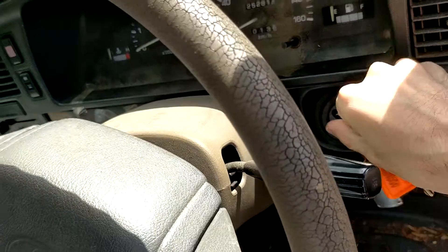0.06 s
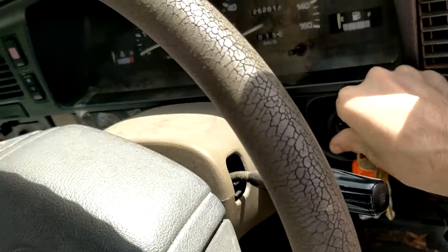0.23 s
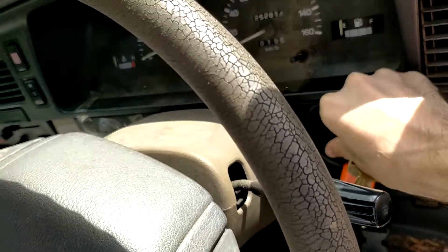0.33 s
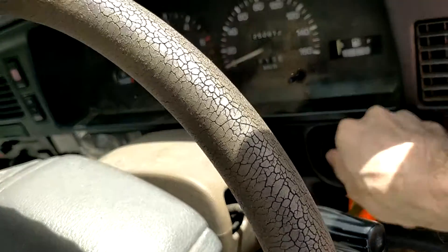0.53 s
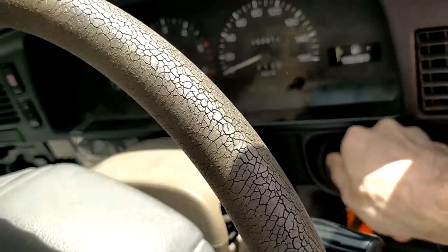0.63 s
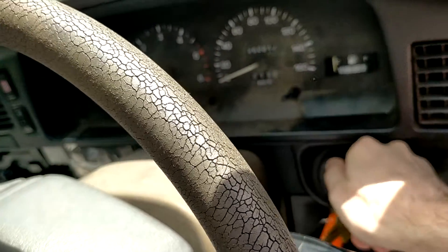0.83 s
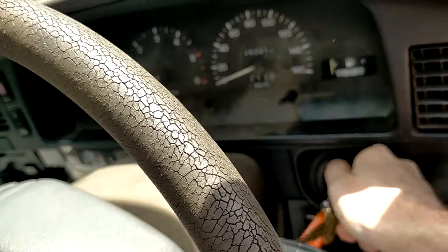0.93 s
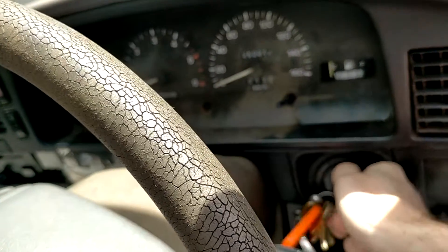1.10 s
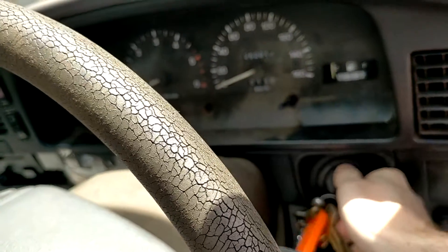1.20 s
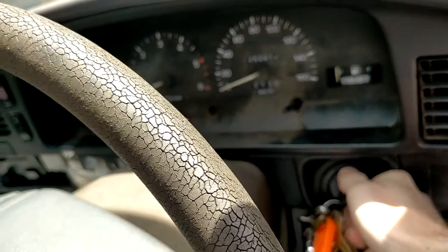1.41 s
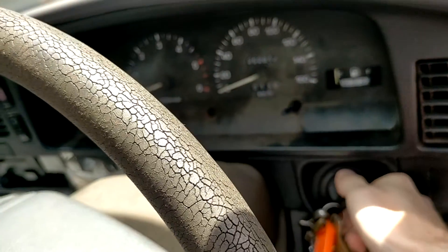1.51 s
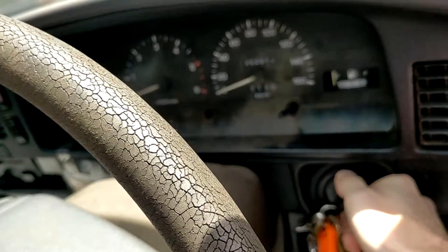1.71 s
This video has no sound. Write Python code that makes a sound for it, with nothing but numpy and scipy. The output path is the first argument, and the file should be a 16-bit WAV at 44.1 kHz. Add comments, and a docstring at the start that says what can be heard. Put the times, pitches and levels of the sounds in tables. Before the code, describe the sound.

A key turns in a car ignition, close and dry in a small quiet cabin. Faint ticks lead to a cluster of clicks and key rattles from 0.24 to 0.45 seconds, more taps around 0.55-0.67, a crunch and clack near 0.75-0.8, then strong gritty crunches at 0.9-1.15. Small clicks end by 1.3; a tiny scrape follows at 1.56 over faint hiss, rumble and thin distant whine.

```python
"""Key in a car's ignition lock

A hand works the key, with a phone recording close by in the quiet cabin.
Taps of key bunch and lock ring the plastic dashboard and the damped keys, as sums of dying sines.
Lock parts crunch through their detents: dense bursts of random clicks drive the same objects and a thud.
The hand rustles, in patchy clicks, and thumps, in swelling low sines.
Shaped noise gives faint hiss and rumble beneath, and a gliding sine a far whine."""
import sys
import numpy as np
from scipy import signal
from scipy.fft import rfft, irfft
from scipy.io import wavfile
from scipy.ndimage import uniform_filter1d

SR = 44100
rng = np.random.default_rng(int(sys.argv[2]) if len(sys.argv) > 2 else 0)


def generate_wav(signal):
    """Clip the signal to [-1, 1] and save it as 16-bit WAV at the path in sys.argv[1]."""
    frames = np.transpose(np.atleast_2d(signal))
    scaled = np.clip(frames, -1, 1) * 32767
    pcm = np.round(scaled).astype(np.int16)
    wavfile.write(sys.argv[1], SR, pcm)


N = 77175

# Resonances of the plastic dashboard panel. Each row: frequency in Hz, relative level in dB,
# undamped t60 in seconds.
PANEL_MODES = [(560, -36, 0.21), (800, -26.5, 0.0077), (879, 4, 0.049), (1033.5, -8.5, 0.1),
               (1310, 6.5, 0.018), (1540, -1.5, 0.047), (1690, 3.5, 0.019), (1890, -2, 0.016),
               (2055, 1.5, 0.026), (2327, 5, 0.01), (2380, 1.5, 0.017), (2580, -1.5, 0.034),
               (3074, 0.5, 0.032)]
# Resonances of the key bunch. Each row: frequency in Hz, relative level in dB, undamped t60 in seconds.
KEY_MODES = [(3500, 2, 0.015), (3660, -6.5, 0.13), (4167, -1, 0.046), (4387, -4, 0.07),
             (4916, 16.5, 0.0061), (5277, 2.5, 0.035), (5860, 5.5, 0.011), (6116, -7.5, 0.043),
             (6456, 7.5, 0.024), (6970, 4, 0.042), (7480, 16, 0.0091), (7773, -15.5, 0.036),
             (8100, -24, 0.019)]
# Low resonances heard as a thud. Each row: frequency in Hz, relative level in dB, undamped t60 in seconds.
THUD_MODES = [(130, 5.5, 0.054), (165, 4, 0.088), (300, 9, 0.026), (438, 9.5, 0.014), (560, 0.5, 0.04),
              (816, -4.5, 0.074)]


def undb(db):
    """Amplitude factor of a level in dB."""
    return 10 ** (np.asarray(db) / 20)


def unit(x):
    """Signal scaled to rms 1."""
    return x / np.sqrt(np.mean(x ** 2))


def unit_energy(x):
    """Signal scaled to energy 1."""
    return x / np.sqrt(np.sum(x ** 2))


def fade(t, t60):
    """Exponential decay that falls 60 dB in t60 seconds."""
    return np.exp(-np.log(1000) * t / t60)


def add(out, start, x):
    """Mix x into out from start (s), cut at the end of out."""
    i = int(start * SR)
    x = x[:len(out) - i]
    out[i:i + len(x)] += x


def ring(modes, chance, damp, focus_hz=None, slope_db=15.5):
    """Answer of an object to one blow, energy 1; the favoured pitch sets each mode's share and phase.

    damp is a share of the undamped t60; slope_db weakens modes per octave away from focus_hz."""
    scatter_db, detune = 1.5, .005  # spread of level; of frequency, as a share
    in_phase_oct = .42  # modes this near the favoured pitch start together, the others opposite
    t = np.arange(SR // 5) / SR
    out = np.zeros(len(t))
    for k, ((hz, db, t60), a, b) in enumerate(zip(modes, chance, chance[::-1])):
        if focus_hz:
            octaves_off = abs(np.log2(hz / focus_hz))
            sign = np.sign(in_phase_oct - octaves_off)
        else:
            octaves_off = 0
            sign = (-1) ** k
        level = undb(db - slope_db * octaves_off + scatter_db * a)
        tone = np.sin(2 * np.pi * hz * (1 + detune * b) * t)
        out += sign * level * fade(t, t60 * damp) * tone
    edges = [.8 * modes[0][0], 1.15 * modes[-1][0]]
    return unit_energy(signal.sosfilt(signal.butter(3, edges, "bandpass", fs=SR, output="sos"), out))


def clicks(count, rate):
    """Random clicks of uneven size and either polarity, rate per second on average, rms 1."""
    spread_db = 2.5
    chance, polarity, size = rng.random((count, 3)).T
    happens = chance < rate / SR
    gain = undb(-spread_db * np.log(size + .03))  # a few clicks stand out
    return unit(happens * np.sign(polarity - .5) * gain)


def rubbed(drive, modes, damp, focus_hz=None):
    """Clicks played through a damped object; many contacts spread wider in pitch than one blow."""
    answer = ring(modes, np.zeros(13), damp, focus_hz, slope_db=8)
    return signal.fftconvolve(drive, answer)[:len(drive)]


def hiss_and_rumble():
    """Steady noise shaped in the spectrum, strongest at the lowest frequencies."""
    # Spectrum of the floor. Each row: frequency in Hz, relative density in dB per Hz.
    floor_shape = [(15, 2.5), (33, -8.5), (64, -9), (223, -21), (348, -32), (583, -28), (697, -28.5),
                   (1220, -29), (1560, -27), (2280, -38), (6400, -36.5), (8000, -42), (10400, -74),
                   (17600, -120)]
    hz, db = np.array(floor_shape).T
    f = np.maximum(np.arange(N // 2 + 1) * SR / N, 1)
    gain = undb(np.interp(np.log(f), np.log(hz), db))
    noise = irfft(rfft(rng.standard_normal(N)) * gain, N)
    return undb(-59.5) * unit(noise)


def far_whine(t):
    """Thin sine whose pitch and level glide between set points."""
    # Path of the whine. Each row: time in seconds, frequency in Hz, rms level in dB.
    whine_path = [(0, 1685, -82.5), (0.201, 1583, -71), (.7, 1587, -89.5), (1.2, 1540, -86),
                  (1.451, 1536, -75.5), (1.598, 1526, -79.5), (1.75, 1520, -73)]
    s, hz, db = np.array(whine_path).T
    phase = 2 * np.pi * np.cumsum(np.interp(t, s, hz)) / SR
    return undb(np.interp(t, s, db)) * np.sqrt(2) * np.sin(phase)


def patchy():
    """Uneven gain that moves from scuff to scuff, with short slopes between."""
    spread_db, scuff_s = 3.5, .008
    k = int(scuff_s * SR)
    steps_db = np.repeat(rng.standard_normal(N // k + 1), k)[:N]
    return undb(spread_db * uniform_filter1d(steps_db, k // 3 + 1))


def rustle(t):
    """Continuous small scrapes of fingers and key ring: patchy clicks through panel, keys and thud."""
    # Level of the rustle. Each row: time in seconds, then panel, key and thud levels in dB.
    rustle_levels = [(0.0, -64.5, -73.5, -63.5), (0.094, -111, -113, -90), (0.188, -74, -73, -64.5),
                     (0.216, -92, -93, -64), (0.246, -55.5, -64, -56.5), (0.316, -62.5, -59, -65),
                     (0.4, -50, -67, -56), (0.444, -62, -79, -66), (0.596, -63.5, -80.5, -57),
                     (0.626, -84, -85, -71), (0.648, -53, -66, -56.5), (0.673, -65.5, -81, -81),
                     (0.726, -75.5, -79.5, -70), (0.762, -66.5, -76, -59.5), (0.882, -73, -84, -68.5),
                     (0.944, -58.5, -65.5, -67.5), (0.986, -73.5, -79.5, -73), (1.006, -43, -70.5, -57.5),
                     (1.103, -89, -78, -67), (1.144, -50.5, -55, -49), (1.188, -66, -76, -66),
                     (1.256, -68.5, -77, -70.5), (1.354, -76.5, -79, -79.5), (1.398, -77, -80.5, -77.5),
                     (1.75, -77.5, -86, -76.5)]
    s, panel_db, key_db, thud_db = np.array(rustle_levels).T
    # level, object, damping share, clicks per second, favoured Hz (soft fingers favour a low panel pitch)
    parts = [(panel_db, PANEL_MODES, .4, 1500, 1250),
             (key_db, KEY_MODES, .5, 1200, None),
             (thud_db, THUD_MODES, .5, 600, None)]
    out = np.zeros(N)
    for db, modes, damp, rate, hz in parts:
        scrape = rubbed(patchy() * clicks(N, rate), modes, damp, hz)
        out += undb(np.interp(t, s, db)) * scrape
    return out


def thumps():
    """Dull pushes of the hand on the column: each a sine that swells and dies."""
    # Each row: start in seconds, frequency in Hz, level in dB before swell and decay,
    # rise time constant in seconds, t60 in seconds.
    thump_rows = [(0.243, 130, -39.5, 0.0037, 0.12), (0.317, 45.6, -44.5, 0.016, 0.28),
                  (0.384, 41.7, -51, 0.0088, 0.1), (0.579, 154, -53.5, 0.01, 0.15),
                  (0.761, 295, -51, 0.0023, 0.075), (1.031, 165, -51.5, 0.0063, 0.11),
                  (1.137, 96, -46, 0.0051, 0.1), (1.129, 600, -36.5, 0.0025, 0.038),
                  (1.151, 446, -37.5, 0.0017, 0.029)]
    out, t = np.zeros(N), np.arange(SR // 2) / SR
    for start, hz, db, rise, t60 in thump_rows:
        envelope = (1 - np.exp(-t / rise)) * fade(t, t60)
        add(out, start, undb(db) * envelope * np.sin(2 * np.pi * hz * t))
    return out


def crunches():
    """Lock parts through their detents: dense clicks swell, hold and die; the thud follows a little late."""
    # Each row: start, rise, hold and fall t60 in seconds, panel, key and thud levels in dB,
    # favoured panel, key and thud pitches in Hz.
    crunch_rows = [(0.364, 0.014, 0.01, 0.037, -52, -73, -69, 1690, 4960, 300),
                   (0.738, 0.0069, 0.0097, 0.057, -41, -47.5, -50, 1920, 5900, 300),
                   (0.895, 0.0014, 0.013, .04, -67, -64, -89, 1540, 7000, 560),
                   (0.92, 0.0011, 0.0087, 0.057, -50.5, -46, -54, 1910, 5630, 560),
                   (0.998, 0.0021, 0.0043, 0.042, -37.5, -37.5, -49.5, 2534, 5630, 560),
                   (1.115, 0.01, 0.0037, 0.056, -34.5, -37.5, -47, 2700, 5170, 571),
                   (1.558, 0.007, .015, 0.13, -68.5, -81, -84, 1610, 5600, 300)]
    clicks_per_s, thud_delay_s = 5000, 0.00767
    out, t = np.zeros(N), np.arange(SR // 4) / SR
    for start, rise, hold, t60, panel_db, key_db, thud_db, panel_hz, key_hz, thud_hz in crunch_rows:
        swell = np.clip(t / rise, 0, 1) ** 1.8
        fall = fade(np.clip(t - rise - hold, 0, None), t60)
        drive = swell * fall * clicks(len(t), clicks_per_s)
        panel = undb(panel_db) * rubbed(drive, PANEL_MODES, .6, panel_hz)
        keys = undb(key_db) * rubbed(drive, KEY_MODES, .55, key_hz)
        thud = undb(thud_db) * rubbed(drive, THUD_MODES, .6, thud_hz)
        add(out, start, panel + keys)
        add(out, start + thud_delay_s, thud)
    return out


def taps():
    """Each tap: a blow and a dying chatter of rebounds, into the panel and the keys."""
    # Each row: start in seconds, level in dB, panel and key levels in dB relative to it,
    # chatter t60 in seconds, chatter level in dB, favoured panel and key pitches in Hz.
    tap_rows = [(0.134, -46.5, -5.5, -18.5, 0.064, 0.5, 1250, 4400),
                (0.172, -46.5, -11.5, -13, 0.059, 0, 1670, 6400),
                (0.214, -46, -4.5, -15, 0.11, 3, 1690, 6470),
                (0.24, -30, -8.5, -14.5, 0.063, -7, 2380, 4740),
                (0.247, -33, -7.5, -20, 0.039, -20.5, 1580, 6580),
                (0.265, -36.5, -23, -13.5, 0.042, -6.5, 2180, 6970),
                (0.296, -35, -46, -18.5, 0.05, 0, 1570, 6950),
                (0.343, -24.5, -12, -16, 0.073, -9.5, 2130, 5800),
                (0.387, -44, -1, -9, 0.028, -14, 1900, 4900),
                (0.392, -39.5, -4, -12.5, 0.017, 5, 1890, 4900),
                (0.3953, -26, -2, -27, 0.026, -11.5, 1754, 3830),
                (0.4, -34, -6.5, -13.5, 0.051, -6.5, 1850, 3220),
                (0.409, -40, -2.5, -7.5, 0.011, 0, 1820, 4210),
                (0.439, -54, -10, -12.5, 0.028, -4, 1500, 4300),
                (0.467, -48.5, -5.5, -21, 0.025, 2, 2300, 3300),
                (0.514, -49.5, -4.5, -16.5, 0.047, 1.5, 824, 4060),
                (0.532, -43.5, -1.5, -17, 0.017, -9, 1340, 6620),
                (0.545, -39.5, -10, -13.5, 0.031, 0, 2000, 5600),
                (0.558, -54, -4, -8, 0.11, 7.5, 2580, 5040),
                (0.566, -30.5, -7.5, -10.5, 0.026, -2, 1157, 5030),
                (0.584, -26.5, -14.5, -22, 0.048, -8.5, 1310, 4250),
                (0.628, -55, 0.5, -8, 0.053, 0.5, 1300, 4900), (0.643, -39, -24, -11, 0.036, -7, 846, 6160),
                (0.647, -35.5, -20, -12, 0.025, -6, 1890, 7000),
                (0.654, -45, -1, -7.5, 0.031, -1.5, 2520, 4860),
                (0.667, -43, -6.5, -15, 0.035, -0.5, 2040, 4220),
                (0.798, -23.5, -11.5, -33, 0.052, -13, 1340, 5060),
                (1.0909, -39.5, 2, -31, 0.12, -12, 1620, 7700),
                (1.164, -34, -9.5, -11, 0.029, -3, 1690, 4800),
                (1.194, -51, -12, -15, 0.079, -1, 2350, 5290),
                (1.215, -58, -7.5, -30, 0.064, -0.5, 940, 7540),
                (1.235, -30.5, -5.5, -25.5, 0.04, -6, 1690, 3840),
                (1.276, -44, -0.5, -19, 0.042, -6, 1590, 4380),
                (1.281, -46, -7.5, -10.5, 0.032, -3.5, 1440, 6860),
                (1.305, -42, -13.5, -25, 0.038, 0.5, 1990, 3770)]
    chatter_per_s = 6000
    panel_damp, key_damp = 1, 0.45  # shares of the undamped t60; the hand grips the keys
    out, t = np.zeros(N), np.arange(SR // 10) / SR
    blow = (t == 0) * np.sqrt(SR / 1000)  # as much energy as 1 ms at rms 1
    for row, chance in zip(tap_rows, rng.standard_normal((len(tap_rows), 13))):
        start, db, panel_db, key_db, t60, chatter_db, panel_hz, key_hz = row
        parts = [(panel_db, PANEL_MODES, panel_damp, panel_hz),
                 (key_db, KEY_MODES, key_damp, key_hz)]
        for part_db, modes, damp, hz in parts:
            chatter = undb(chatter_db) * clicks(len(t), chatter_per_s) * fade(t, t60)
            struck = signal.fftconvolve(blow + chatter, ring(modes, chance, damp, hz))
            add(out, start, undb(db + part_db) * struck)
    return out


def cabin(x):
    """Short dense reflections of the small cabin: a decaying noise tail after a 2 ms gap."""
    t = np.arange(SR // 5) / SR
    tail = rng.standard_normal(len(t)) * fade(t, 0.048) * (t > .002)
    return x + undb(-27.5) * signal.fftconvolve(x, unit_energy(tail))[:N]


def scene():
    """Taps and crunches in the cabin, over the hand's sounds and the quiet background."""
    t = np.arange(N) / SR
    background = hiss_and_rumble() + far_whine(t)
    hand = rustle(t) + thumps()
    lock = cabin(crunches() + taps())
    return (background + hand + lock)[None]


def record(dry):
    """The phone cuts the top steeply above 7850 Hz; a trace of converter hiss stays."""
    cut = signal.sosfilt(signal.butter(24, 7850, fs=SR, output="sos"), dry)
    return cut + undb(-105) * rng.standard_normal(dry.shape)


dry = scene()
out = record(dry)
generate_wav(out)
```